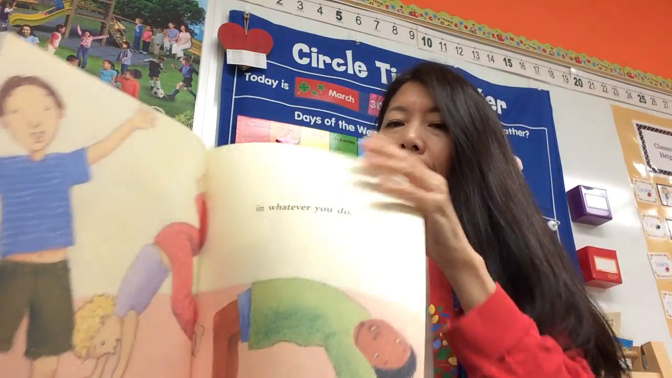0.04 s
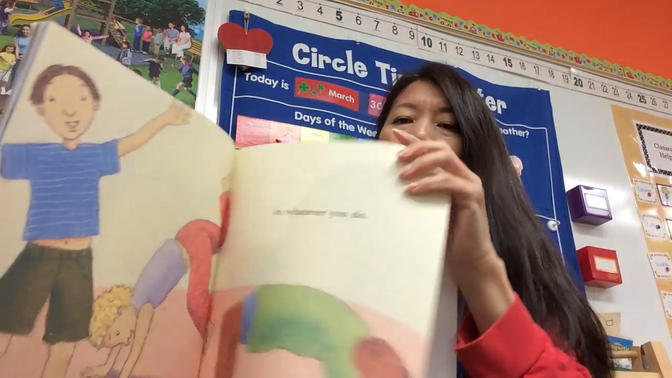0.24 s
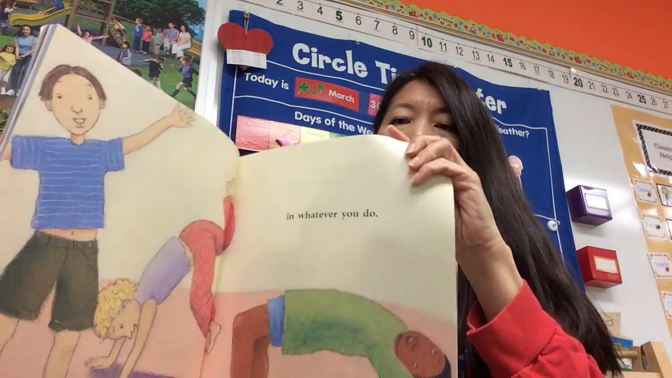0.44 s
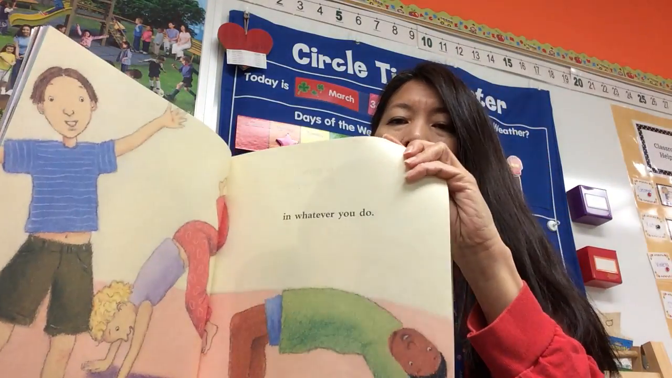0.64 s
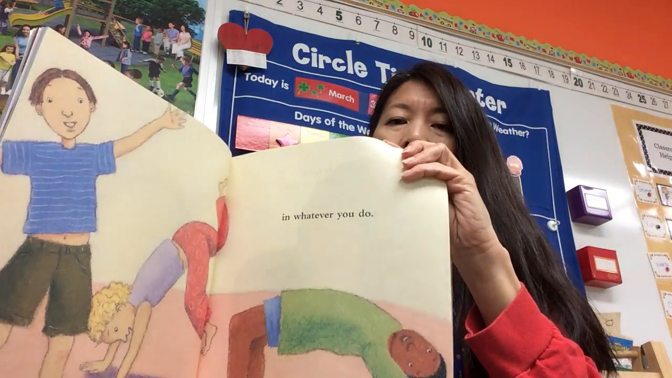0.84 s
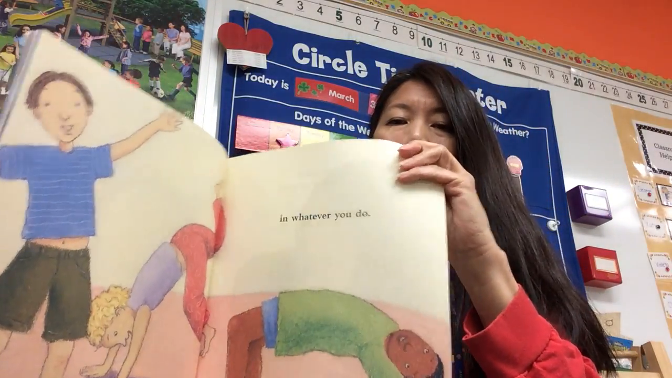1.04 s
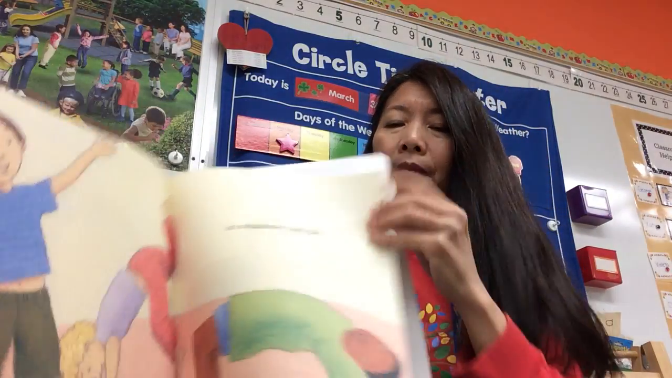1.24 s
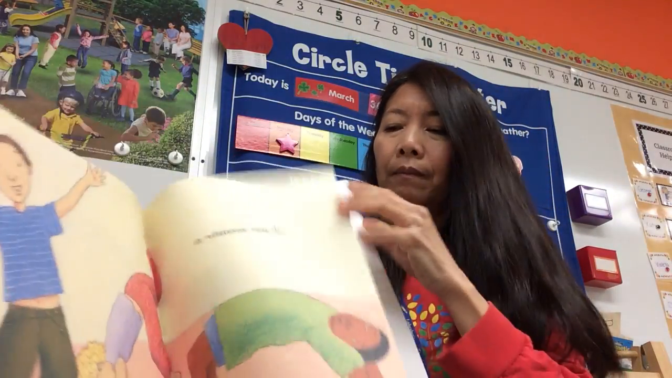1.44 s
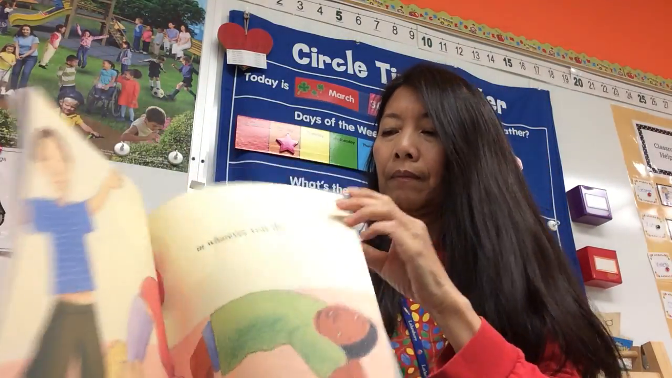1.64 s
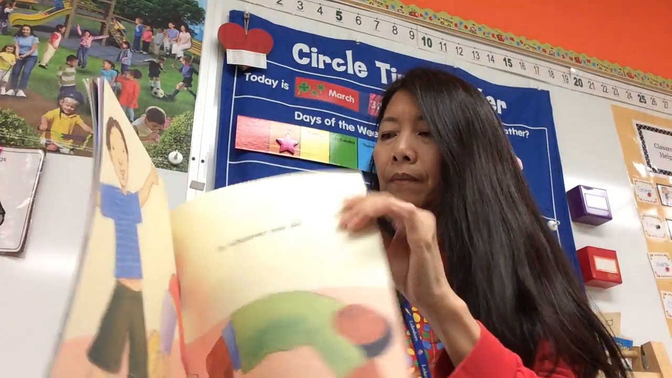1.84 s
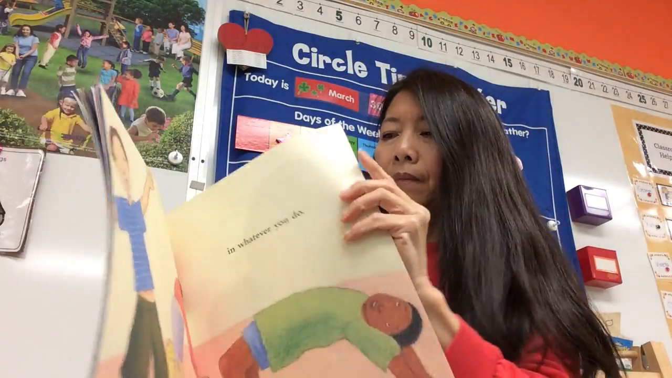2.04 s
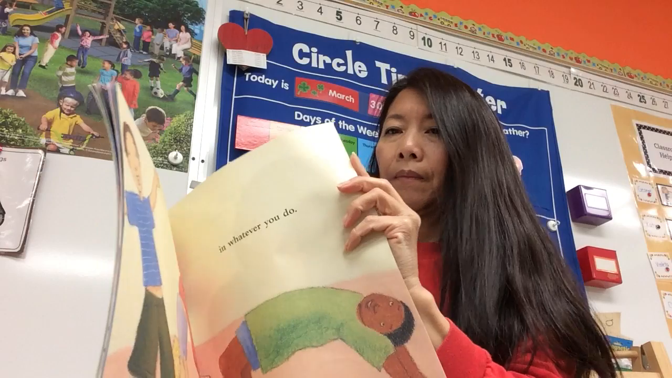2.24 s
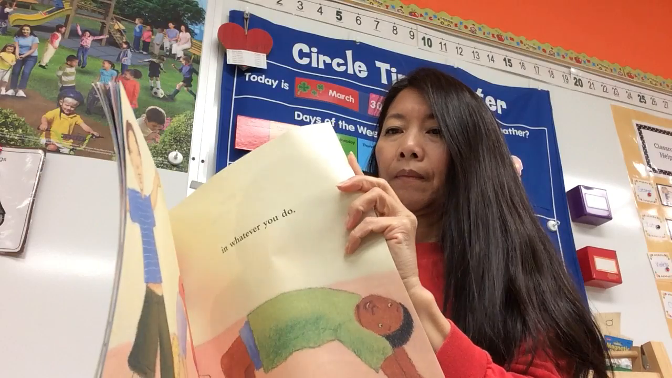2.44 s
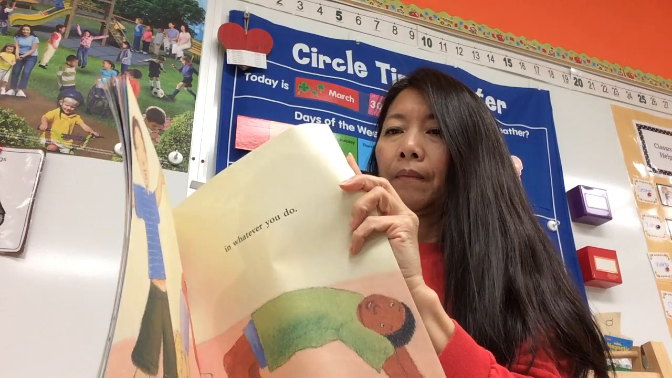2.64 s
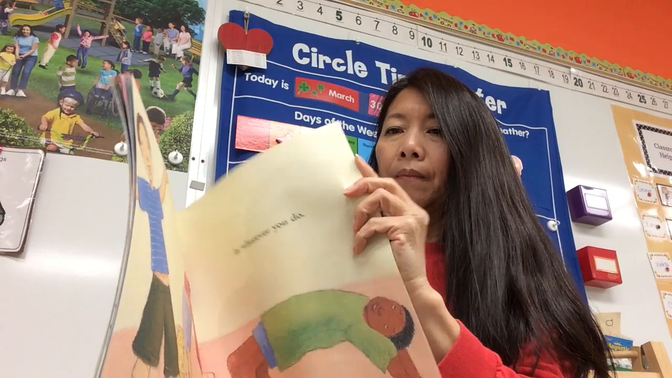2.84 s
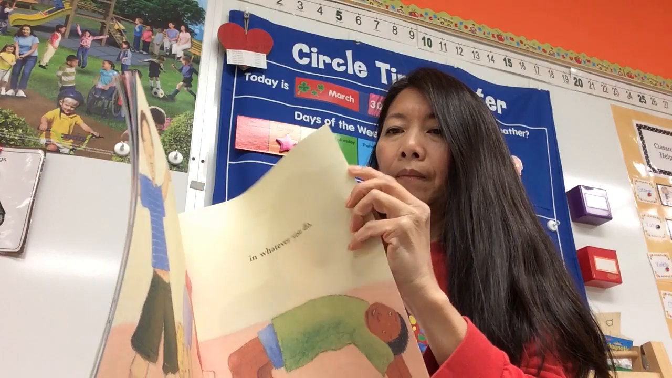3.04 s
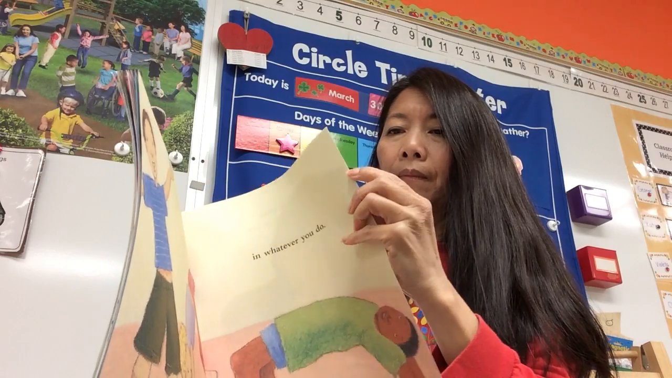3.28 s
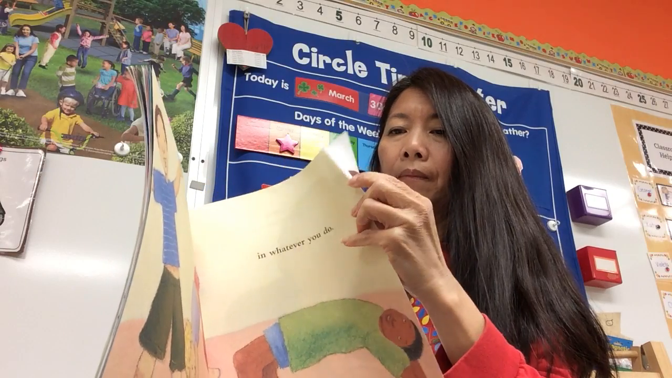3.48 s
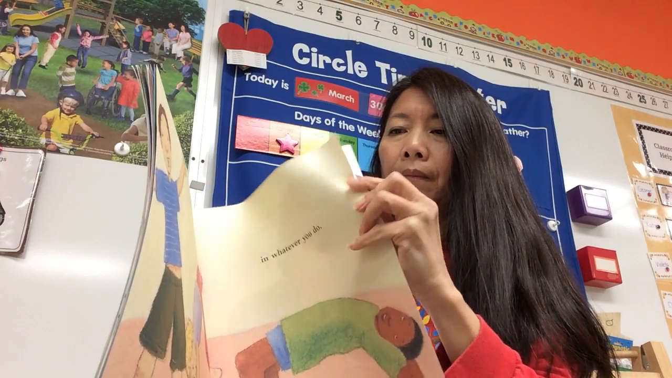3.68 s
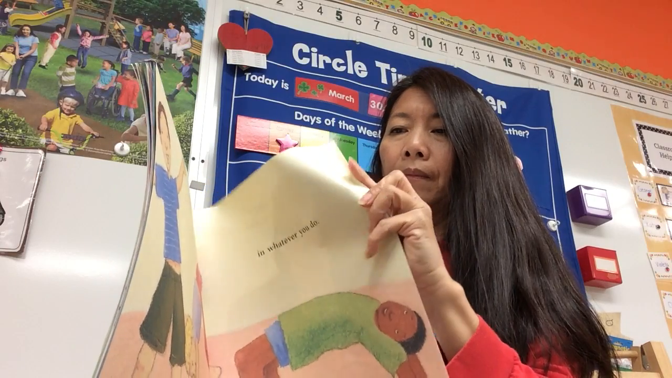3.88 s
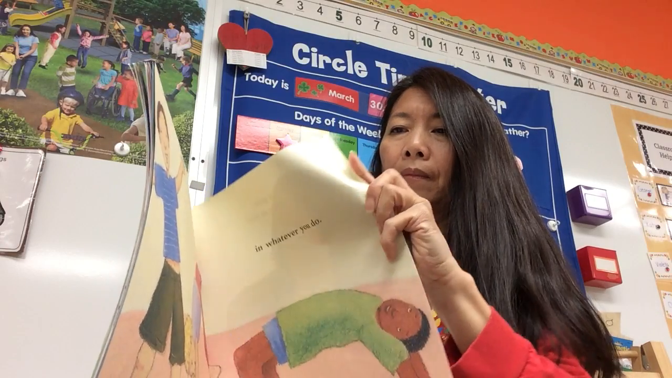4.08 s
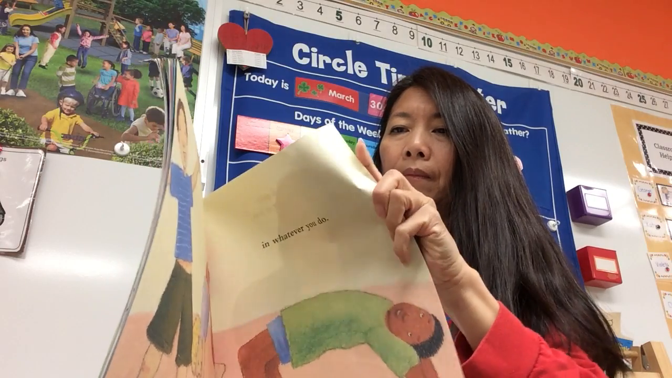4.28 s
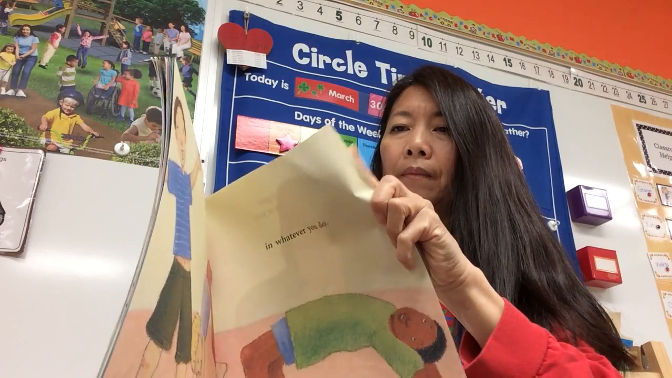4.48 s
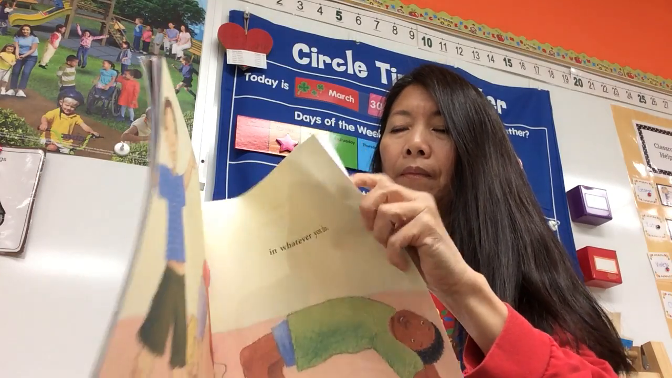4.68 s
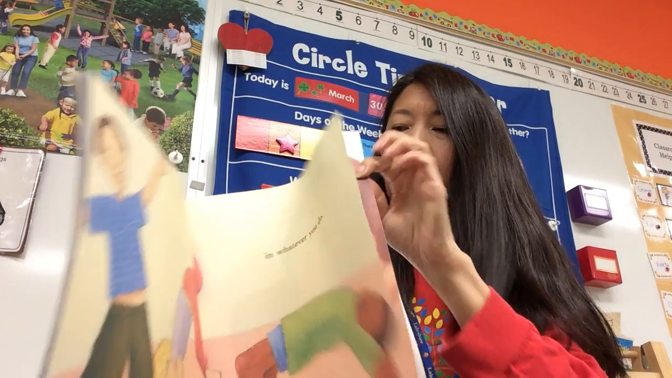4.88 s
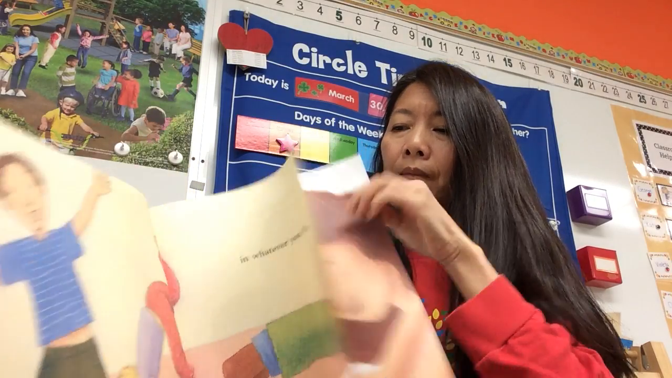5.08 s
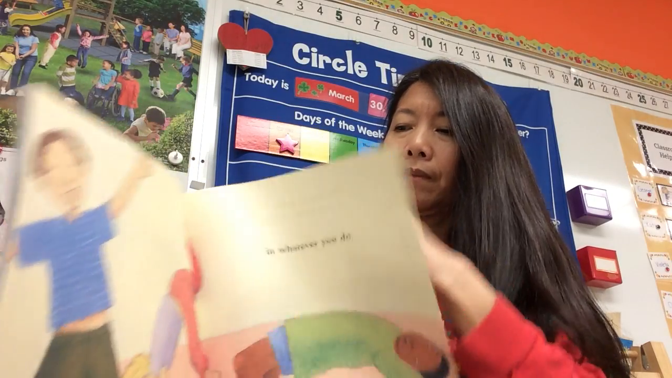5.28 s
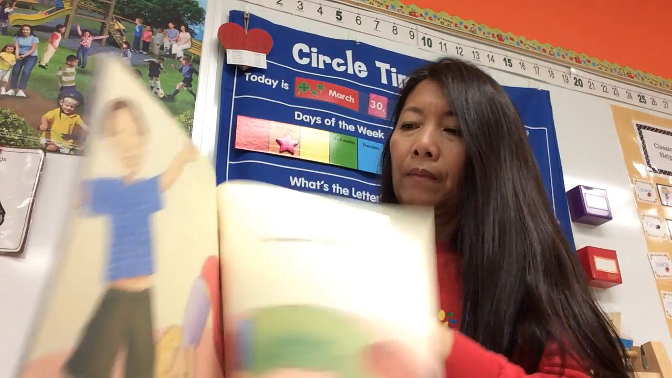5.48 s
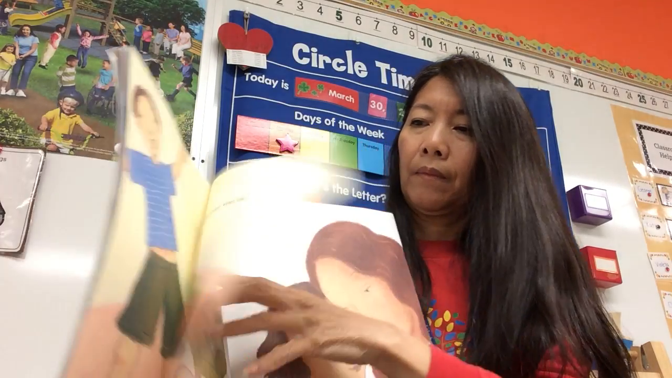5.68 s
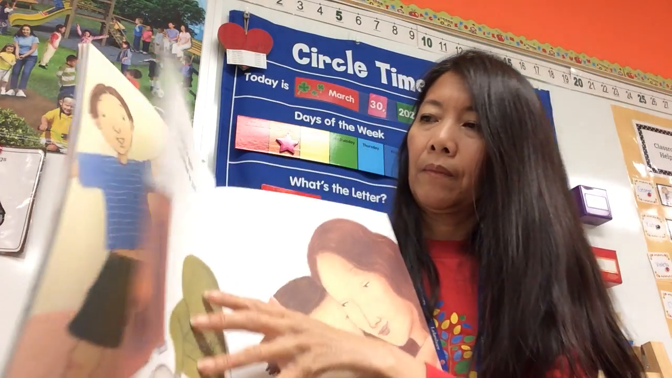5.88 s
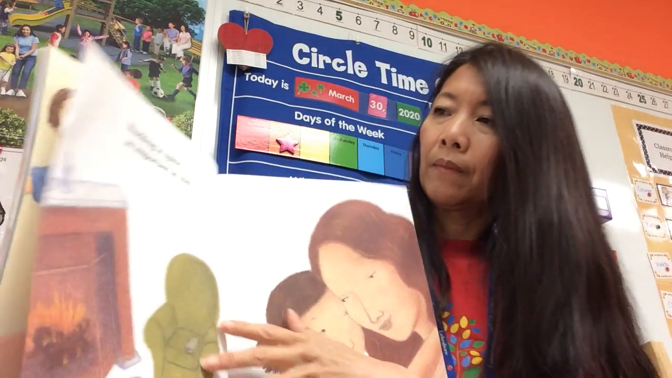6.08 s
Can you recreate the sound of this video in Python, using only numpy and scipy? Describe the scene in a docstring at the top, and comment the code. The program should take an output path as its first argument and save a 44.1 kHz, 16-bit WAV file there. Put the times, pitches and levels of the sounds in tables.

```python
"""A large picture book is handled close to a small microphone in a quiet room.
It starts with a soft bump of the hand and the dry hiss of fingers and sheets sliding. Stiff pages buckle
and snap from 1.1 to 1.6 s, and sharply at 2.2 s; lighter rubbing follows. From 4.5 to 5.7 s bent sheets
flap, flutter, slide and snap at their loudest, and one last slide swells to the end.
A fan with one wavering tone and a low rumble run throughout."""
import sys
import numpy as np
from scipy import signal
from scipy.io import wavfile

SR = 44100
rng = np.random.default_rng(int(sys.argv[2]) if len(sys.argv) > 2 else 0)


def master(y):
    """Save y as 16-bit WAV."""
    cut = np.clip(np.atleast_2d(y).T, -1, 1)
    pcm = np.round(cut * 32767)  # scale
    wavfile.write(sys.argv[1], SR, pcm.astype(np.int16))


N = 269872

# A sheet buckles. Each row: start in seconds, boom, knock, crack and tick levels in dB,
# crease run-out time in ms.
BUCKLES = [(.041, -59.5, -50.5, -70, -64, 4), (.099, -49, -68.5, -68, -80, 3.4),
           (.177, -66, -56.5, -71, -66, 8.9), (.288, -60, -51, -69, -65, 10),
           (.347, -59, -49, -104, -74, 6.5), (.46, -55, -64, -94, -88, 9.3),
           (1.1183, -49.5, -34.5, -40.5, -51, 2.3), (1.235, -38, -36, -70, -84, 1.8),
           (1.253, -45.5, -52, -89, -82, 2.8), (1.3, -47, -53, -95, -61, 6), (1.4, -45, -28, -53, -59, 2.7),
           (1.417, -51, -32, -51, -70, 4), (1.437, -49, -41.5, -68, -70, 1.7),
           (1.5066, -61, -48, -59, -59, 6.7), (1.526, -48, -47.5, -56, -61, 1.9),
           (1.542, -49, -43, -97, -90, 7.3), (1.609, -54, -22, -50, -102, 5.5),
           (1.625, -54, -29, -85, -84, 2.1), (1.637, -58, -29.5, -90, -90, 0.73),
           (1.714, -60, -54.5, -77, -93, 2.5), (1.91, -54, -62, -102, -90, 7.1),
           (1.949, -49.5, -64, -80, -75, 5.3), (2.114, -44.5, -70, -81, -79, 5.0),
           (2.2171, -30.5, -33.5, -32, -40, 1.13), (2.819, -53, -73, -75, -82, 3.8),
           (2.957, -54.5, -70, -72, -84, 2.1), (3.116, -49, -80, -79, -87, 4.6),
           (3.448, -58, -59, -92, -79, 5.8), (3.5225, -51.5, -45.5, -50, -104, 2.1),
           (3.772, -40.5, -51, -78, -84, 6.9), (4.16, -36.5, -51.5, -109, -75, 2.5),
           (4.43, -47.5, -59, -82, -79, 1.9), (4.4919, -45, -64, -44.5, -40, 2.6),
           (4.5, -58, -48, -43.5, -47, 0.89), (4.607, -52, -50, -52, -46.5, 2.7),
           (4.76, -40, -64, -59, -51, 3.6), (4.798, -47.5, -41, -56, -53, 9.8),
           (4.929, -50, -52, -66, -63, 3), (4.939, -40, -47.5, -68, -86, 2.1),
           (4.958, -43, -56, -81, -89, 3.5), (5.0044, -42, -69, -69, -82, 0.88),
           (5.025, -41, -45.5, -41, -73, 2.4), (5.101, -49.5, -54, -60, -100, 3),
           (5.188, -38, -57, -77, -80, 3.4), (5.2016, -32.5, -35, -29, -51.5, 3.1),
           (5.2359, -48, -57, -34, -100, 1.3), (5.316, -52, -28, -34.5, -116, 6.5),
           (5.422, -37.5, -36.5, -30.5, -47, 5.9), (5.522, -33.5, -32.5, -28, -43.5, 4.5),
           (5.537, -50, -31, -37, -81, 2.9), (5.5725, -36.5, -28.5, -37, -48.5, 7),
           (5.604, -48, -34, -29.5, -55, 0.79), (5.62, -59, -26.5, -52, -73, 3.6),
           (5.823, -74, -56, -67, -50, 3.6), (5.845, -57.5, -49.5, -68, -84, 3.2)]
SNAP_ZONES_HZ = (170, 550, 1250, 4500, 10000)   # thump, boom, knock, crack, tick
# Modes of the held pages. Each row: frequency in Hz, gain in dB, T60 in seconds.
PAGE_MODES = [(75, -3, 0.15), (127, -2, 0.041), (181, 0.5, 0.041), (353, -1.5, 0.026), (465, -3, 0.018),
              (586, 1, 0.03), (699.6, 4, 0.02), (1038, 1.5, 0.01), (1142.6, -4, 0.089),
              (1298, -3.5, 0.0097), (1534, -6.5, 0.027), (1732, -2.5, 0.021), (2134, -8.5, 0.0091),
              (2460, -3, 0.019), (3080, -6, 0.0031), (4420, -7, 0.0037), (4800, 4.5, 0.002),
              (6420, -4, 0.0048), (6320, 1, 0.0034), (7900, -4.5, 0.0088), (9100, 3, 0.00047),
              (12600, -6.5, 0.0028), (14600, -6, 0.0012)]
# A finger or sheet slides. Each row: peak time in seconds, build-up and hold in seconds, level in dB,
# treble tilt in dB per octave, low and high rasp in dB relative to the hiss.
SLIDE_STROKES = [(.03, 0.084, 0.011, -60, 2, -7, -1), (0.1, .035, 0.017, -61.5, -6.5, -6, -9),
                 (0.19, .03, 0.025, -60, -3, 5, -9), (.35, 0.13, 0.018, -59, 2.5, -1, -0.5),
                 (.53, 0.11, .04, -53.5, -3, -5.5, -6), (0.709, 0.15, 0.0095, -54.5, -2.5, -6.5, -3.5),
                 (0.89, .15, 0.023, -68.5, -6, -2, -3), (1.117, 0.032, .002, -50.5, -10, -4, -7),
                 (1.211, 0.076, 0.018, -56, 0, 0, -2.5), (1.39, 0.086, 0.0088, -46.5, -2, -3.5, -5),
                 (1.485, 0.034, 0.0067, -61, -7, 1, -11), (1.585, 0.026, 0.032, -57.5, 1, -2, -5.5),
                 (1.964, 0.055, 0.015, -58, -4.5, -1.5, -2), (2.123, 0.17, 0.019, -55, -3, -4, -4),
                 (2.223, .06, 0.039, -49, -6, -8, -5.5), (2.34, 0.081, 0.019, -61, -3.5, -1.5, -13),
                 (2.97, 0.076, 0.2, -63, -5.5, -0.5, -7), (3.376, 0.082, .002, -66.5, -7, -10, -9),
                 (3.45, .04, 0.022, -66.5, -1, -5, -6), (3.534, 0.036, 0.011, -63, -11, -11, -13),
                 (3.689, 0.0085, 0.018, -47.5, 5.5, -8.5, -3), (3.81, 0.12, 0.033, -56, -1, -11, -2.5),
                 (3.94, 0.086, 0.047, -58.5, 2, -15, -1), (4.5, 0.034, 0.022, -58, 6, -7, -2),
                 (4.612, 0.025, 0.011, -56, 4, -12, -2), (4.732, 0.036, 0.045, -45.5, -2, -2.5, -2.5),
                 (4.805, 0.036, 0.017, -37.5, -7.5, -7, 4), (4.859, 0.068, 0.038, -39.5, 1, -7.5, -6.5),
                 (5.16, 0.041, 0.015, -44, -5.5, 0, -2), (5.326, 0.048, .01, -58, -5, -19, -20),
                 (5.401, 0.0032, 0.12, -35, -1, -14, -4.5), (5.603, .07, 0.019, -35, -16.5, -13, -11),
                 (5.821, 0.18, 0.0082, -50, 4.5, -3, -10), (6.1, 0.35, .05, -51, -1, 0.5, -8)]
# Friction hiss. Each row: frequency in Hz, relative density in dB.
HISS_SPECTRUM = [(700, -18), (1200, 4.5), (2400, 5), (3500, 1), (4400, 6.5), (6000, -27), (7500, 0),
                 (9000, 5), (12000, 7.5), (15000, -14), (18000, -23)]
# Low and high rasp of a rubbed sheet. Each row: centre in Hz, width in Hz.
RASP_BANDS = [(4350, 910), (6000, 2920)]
# A bent sheet flaps. Each row: peak time in seconds, build-up and hold in seconds,
# dull and hard flutter levels in dB.
SHEET_FLAPS = [(.0, .02, 0.01, -48, -58.5), (0.237, 0.085, 0.028, -71, -54),
               (0.343, 0.12, .002, -48.5, -54.5), (0.467, 0.042, 0.016, -56, -73),
               (1.128, 0.036, .01, -59, -63), (1.236, 0.055, 0.023, -44, -55),
               (1.427, 0.057, .002, -46, -42), (1.606, 0.036, 0.02, -38, -36.5),
               (2.218, 0.021, .002, -42, -43.5), (3.7, 0.057, .02, -53.5, -64),
               (3.78, 0.09, 0.017, -59, -58), (4.19, 0.053, 0.017, -60, -65),
               (4.517, 0.02, .002, -46.5, -52.5), (4.613, 0.025, .002, -46.5, -44.5),
               (4.745, 0.043, .002, -41, -41.5), (4.872, .06, .002, -38.5, -43.5),
               (4.798, .03, 0.016, -53, -50), (4.938, 0.034, 0.022, -45.5, -51.5),
               (5.024, 0.0076, 0.0011, -41.5, -43), (5.156, 0.052, 0.0025, -49.5, -50),
               (5.201, 0.0092, 0.0014, -53, -33), (5.33, 0.076, 0.0018, -33.5, -31.5),
               (5.419, 0.025, 0.084, -36, -38), (5.593, 0.039, 0.0024, -30.5, -18.5),
               (5.819, 0.1, .02, -58, -49)]
# The book shifts between moves. Each row: time in seconds, hiss, dull and hard flutter levels in dB.
HOLD_LEVELS = [(0, -71, -56, -78), (.45, -64, -78, -66), (.8, -79, -75, -70), (1.05, -73, -82, -71.5),
               (1.17, -58.5, -72, -62), (1.5, -63, -58.5, -70), (1.7, -75, -61, -66),
               (1.9, -68.5, -64.5, -69), (2.15, -65.5, -53, -64), (2.32, -61, -75, -70),
               (2.52, -70.5, -69.5, -68), (2.78, -76.5, -72, -74), (2.97, -60, -61.5, -63),
               (3.17, -69, -63.5, -62.5), (3.3, -77, -68, -68.5), (3.52, -77, -59, -67),
               (3.64, -77, -78, -73), (3.76, -69, -61, -60), (4.12, -64.5, -62, -63),
               (4.26, -62, -59.5, -64), (4.45, -61.5, -57.5, -59.5), (4.65, -71, -81, -87),
               (5.05, -65, -83, -79), (5.38, -57, -51, -49), (5.7, -52, -55, -60), (5.9, -61, -67, -55.5),
               (6.118, -66.5, -61.5, -72)]
HOLD_COLOUR_DB = (-1.5, -7.5, -6)   # tilt per octave, low rasp, high rasp between strokes
# A hand or the spine bumps the book. Each row: start in seconds, level in dB.
BOOK_BUMPS = [(.041, -50.5), (0.462, -57), (1.253, -57), (1.421, -57), (1.525, -52), (1.609, -52.5),
              (1.625, -49), (4.16, -51.5), (5.187, -50), (5.421, -44), (5.448, -45), (5.536, -50),
              (5.5728, -41)]
# Air and rumble. Each row: frequency in Hz, relative density in dB.
AIR_SPECTRUM = [(20, -13), (32, -11), (50, 4), (70, -7), (130, -5.5), (250, -14.5), (500, -18.5),
                (1100, -22.5), (2200, -33), (4500, -32), (9000, -33.5), (15000, -40.5)]
# Dips that hollow the mids and dull the top treble. Each row: centre in Hz, width in Hz, gain in dB.
TONE_DIPS = [(820, 160, -9), (3450, 400, -5), (7800, 1200, -6), (13500, 900, -10), (14100, 900, -10),
             (16500, 1500, -10)]

THUMP_RE_BOOM_DB, BUMP_DECAY_S, HIT_SAMPLES = -20, 0.015, 4000
STROKE_DECAY_DB_PER_S, FLAP_DECAY_DB_PER_S = 452, 282
CATCHES_PER_S, BENDS_PER_S = 11000, 9000
ROOM_T60_S, WALL_CUT_HZ, ROOM_DB = 0.37, 1830, -25
AIR_DB, FAN_DB, FAN_HZ, FAN_WIDTH_HZ = -63.5, -67, 581.3, 9
STOPBAND_HZ = 16850


def page_snaps():
    """Each buckling is a short burst of jolts that rings every page mode at its own strength."""
    out = np.zeros(N + HIT_SAMPLES)
    noise = rng.standard_normal((len(BUCKLES), len(PAGE_MODES), 1501))
    t_s = np.arange(1500) / SR
    run_out_s = np.array(BUCKLES)[:, -1:] / 1e3
    for m, (hz, mode_db, t60_s) in enumerate(PAGE_MODES):
        life_s = run_out_s * (1000 / hz) ** 0.16   # treble leaves the crease sooner
        rise = 1 - np.exp(-t_s / (0.35 * life_s))
        shiver = from_db(-11.5) * np.exp(-t_s / (2.7 * life_s))
        jolts = noise[:, m, 1:] * rise * (np.exp(-t_s / life_s) + shiver)
        rung = page_mode(np.pad(jolts, ((0, 0), (0, HIT_SAMPLES - len(t_s)))), hz, t60_s)
        for (start_s, *zone_db, _), sound, scatter_db in zip(BUCKLES, rung, 1.5 * noise[:, m, 0]):
            spectrum = list(zip(SNAP_ZONES_HZ, [zone_db[0] + THUMP_RE_BOOM_DB] + zone_db))
            add_hit(out, start_s, sound, mode_db + db_at_hz(spectrum, hz) + scatter_db)
    return out[:N]


def sliding():
    """Fibres catch and let go thousands of times a second; pressure shifts the tilt and rasp levels."""
    t_s, shapes = swells(SLIDE_STROKES, STROKE_DECAY_DB_PER_S)
    stroke_db, *colour_db = np.transpose(SLIDE_STROKES)[3:]
    stroke_power = shapes * from_db(2 * stroke_db)[:, None]
    hold_power = from_db(2 * curves(HOLD_LEVELS)[0])
    power = per_sample(t_s, stroke_power.sum(axis=0)) + hold_power
    # Power-weighted colour: the loudest stroke dominates.
    tilt_db, *rasp_db = ((per_sample(t_s, own_db @ stroke_power) + hold_db * hold_power) / power
                         for own_db, hold_db in zip(colour_db, HOLD_COLOUR_DB))
    catches = grains(CATCHES_PER_S, spread_db=2.5, clump_db=-1.0)
    bands = list(third_octaves(catches, HISS_SPECTRUM, lowest_hz=698.0))
    untilted_rms = np.sqrt(np.mean(sum(band for _, band in bands) ** 2))
    hiss = sum(band * from_db(tilt_db * np.log2(max(hz, 4000) / 6000) + 2.5 * drift(13))
               for hz, band in bands) / untilted_rms
    for stream, (hz, width_hz), level_db in zip(catches, RASP_BANDS, rasp_db):
        rasp = unit_rms(band_pass(stream, hz - width_hz / 2, hz + width_hz / 2))
        hiss = from_db(-1.5) * hiss + rasp * from_db(level_db + 1.4 * drift(9.8))
    return hiss * np.sqrt(power) * from_db(1.8 * drift(28))


def sheet_flutter():
    """Small bends come in clumps and ring the middle page modes."""
    t_s, shapes = swells(SHEET_FLAPS, FLAP_DECAY_DB_PER_S)
    dull, hard = (np.sqrt(per_sample(t_s, from_db(2 * peak_db) @ shapes) + from_db(2 * hold_db))
                  for peak_db, hold_db in zip(np.transpose(SHEET_FLAPS)[3:], curves(HOLD_LEVELS)[1:]))
    bends = grains(BENDS_PER_S, spread_db=2.5, clump_db=2.5)[0]
    struck_mode = rng.integers(3, 15, N)
    out = np.zeros(N)
    for m in range(3, 15):
        hz, mode_db, t60_s = PAGE_MODES[m]
        gain = dull if hz < 900 else hard * from_db(-3)
        rung = page_mode(bends * (struck_mode == m), hz, t60_s)
        out += unit_rms(rung) * gain * from_db(mode_db - 6)
    return out


def book_bumps():
    """A soft push rings the three lowest page modes."""
    out = np.zeros(N + HIT_SAMPLES)
    t_s = np.arange(HIT_SAMPLES) / SR
    pushes = rng.standard_normal((len(BOOK_BUMPS), 3, HIT_SAMPLES)) * np.exp(-t_s / BUMP_DECAY_S)
    for m, (hz, mode_db, t60_s) in enumerate(PAGE_MODES[:3]):
        for (start_s, level_db), sound in zip(BOOK_BUMPS, page_mode(pushes[:, m], hz, t60_s)):
            add_hit(out, start_s, sound, level_db + mode_db)
    return out[:N]


def wall_echoes(x):
    """Ten feedback delays, duller on every round."""
    out = np.zeros(N)
    pole = np.exp(-2 * np.pi * WALL_CUT_HZ / SR)
    for k, lag in enumerate((rng.uniform(.003, .03, 10) * SR).astype(int)):
        gain = from_db(-60 * lag / SR / ROOM_T60_S)
        loop, state = x.copy(), [0.]
        for i in range(lag, N, lag):
            echo, state = signal.lfilter([gain * (1 - pole)], [1, -pole], loop[i - lag:i], zi=state)
            loop[i:i + lag] += echo[:N - i]
        out += (loop - x) * (-1) ** k
    return out


def air_rumble():
    """Bass-heavy room noise; each band flickers by about 1 dB."""
    bands = third_octaves(rng.standard_normal((2, N)), AIR_SPECTRUM, lowest_hz=17.57)
    air = sum(band * from_db(drift(36)) for _, band in bands)
    return from_db(AIR_DB) * unit_rms(air)


def fan():
    """Noise through a narrow resonance gives one wavering tone."""
    tone = resonate(rng.standard_normal(N), FAN_HZ, t60_s=2.2 / FAN_WIDTH_HZ)
    return from_db(FAN_DB) * unit_rms(tone)


def page_mode(push, hz, t60_s):
    """A bending mode radiates only near its own frequency."""
    return band_pass(resonate(push, hz, t60_s), hz / 1.5, min(hz * 1.5, 20000))


def resonate(push, hz, t60_s):
    """Two-pole band-pass resonance."""
    radius, angle = from_db(-60 / (t60_s * SR)), 2 * np.pi * hz / SR
    feed = np.sqrt((1 - radius ** 2) / 2) * np.array([1, 0, -1])
    return signal.lfilter(feed, [1, -2 * radius * np.cos(angle), radius ** 2], push + 1e-18)


def add_hit(out, start_s, sound, level_db):
    """Mix in a hit with the energy of 10 ms at an rms of level_db."""
    i = round(start_s * SR)
    out[i:i + len(sound)] += from_db(level_db) * sound * np.sqrt(0.01 * SR / np.sum(sound ** 2))


def grains(per_s, spread_db, clump_db):
    """Two streams of clumped clicks of uneven size and random sign."""
    clicks = rng.random((2, N)) < per_s * from_db(clump_db * drift(25)) / SR
    sizes = from_db(spread_db * np.minimum(rng.exponential(1, (2, N)), 4))
    return clicks * sizes * rng.choice([-1, 1], (2, N))


def swells(moves, decay_db_per_s):
    """Times and relative power of each move: up 20 dB over the build-up, held, then decaying."""
    peak_s, build_s, hold_s = np.transpose(moves)[:3, :, None]
    t_s = np.arange(0, N + 32, 32) / SR
    before_db = 20 * np.maximum(peak_s - t_s, 0) / np.maximum(build_s, .003)
    after_db = decay_db_per_s * np.maximum(t_s - peak_s - hold_s, 0)
    return t_s, 10 ** (-np.minimum(before_db + after_db, 90) / 10)


def third_octaves(streams, spectrum, lowest_hz):
    """Yield (centre Hz, band weighted by the spectrum), alternating between two streams."""
    edges_hz = lowest_hz * 2 ** np.arange(0, np.log2(19000 / lowest_hz), 1 / 3)
    for k, (low_hz, high_hz) in enumerate(zip(edges_hz, edges_hz[1:])):
        hz = np.sqrt(low_hz * high_hz)
        yield hz, band_pass(streams[k % 2], low_hz, high_hz) * from_db(db_at_hz(spectrum, hz))


def drift(rate_hz):
    """Slow random curve of rms 1."""
    step, settle = 40, 2000
    pole = np.exp(-2 * np.pi * rate_hz * step / SR)
    noise = rng.standard_normal(N // step + settle + 2)
    slow = signal.lfilter([1], [1, -2 * pole, pole ** 2], noise)[settle:]
    return np.interp(np.arange(N) / step, np.arange(len(slow)), unit_rms(slow))


def band_pass(x, low_hz, high_hz):
    return signal.sosfilt(signal.butter(2, [low_hz, high_hz], "band", fs=SR, output="sos"), x)


def db_at_hz(spectrum, hz):
    points_hz, points_db = np.transpose(spectrum)
    return np.interp(np.log(hz), np.log(points_hz), points_db)


def curves(rows):
    """Columns of a timed table, one value a sample."""
    t_s, *columns = np.transpose(rows)
    return [per_sample(t_s, column) for column in columns]


def per_sample(t_s, values):
    return np.interp(np.arange(N) / SR, t_s, values)


def unit_rms(x):
    return x / np.sqrt(np.mean(x ** 2) + 1e-20)


def from_db(db):
    return 10 ** (np.asarray(db) / 20)


def scene():
    """The book, its echoes, rumble and fan, in mono."""
    book = page_snaps() + book_bumps() + sliding() + sheet_flutter()
    return (book + from_db(ROOM_DB) * wall_echoes(book) + air_rumble() + fan())[None]


def record(dry):
    """Dips hollow the mids and dull the top treble; a steep low-pass cuts the top."""
    for hz, width_hz, gain_db in TONE_DIPS:
        gain, width = from_db(gain_db), np.tan(np.pi * width_hz / SR)
        centre = -2 * np.cos(2 * np.pi * hz / SR)
        dry = signal.lfilter([1 + width * gain, centre, 1 - width * gain],
                             [1 + width, centre, 1 - width], dry)
    return signal.sosfilt(signal.cheby2(12, 70, STOPBAND_HZ, fs=SR, output="sos"), dry)


dry = scene()
out = record(dry)
master(out)
```